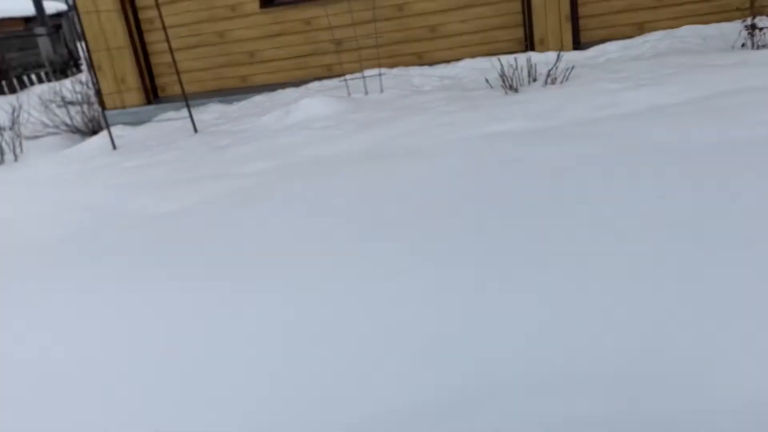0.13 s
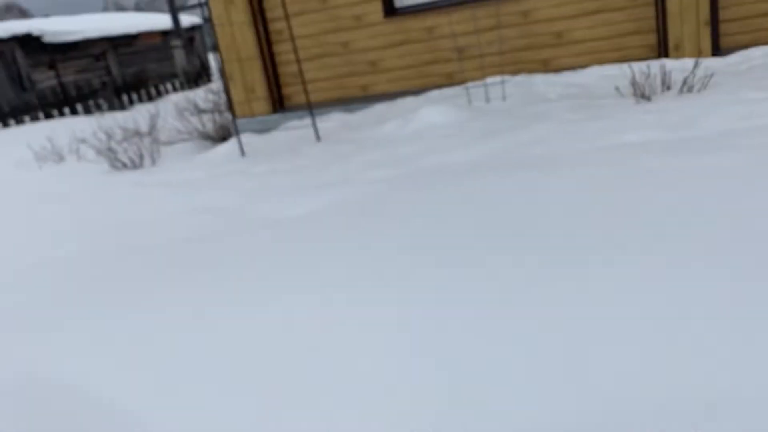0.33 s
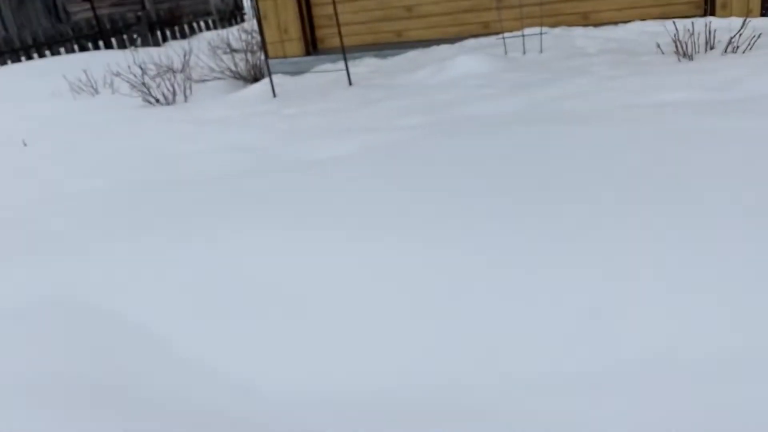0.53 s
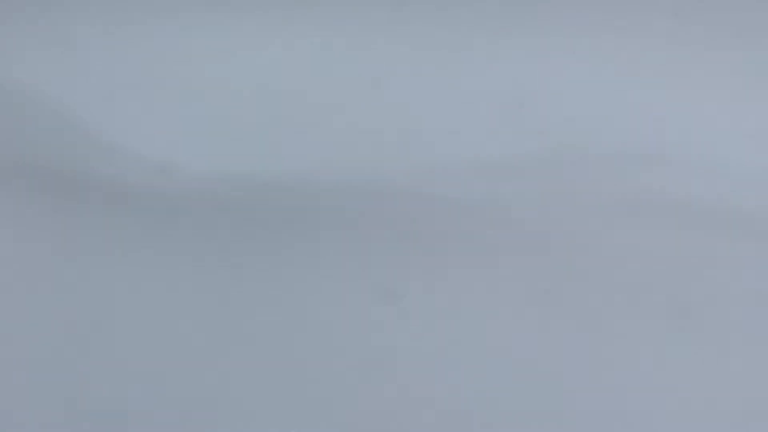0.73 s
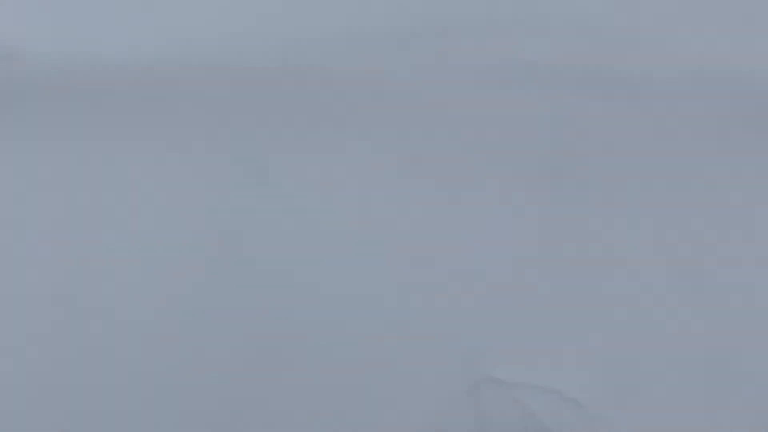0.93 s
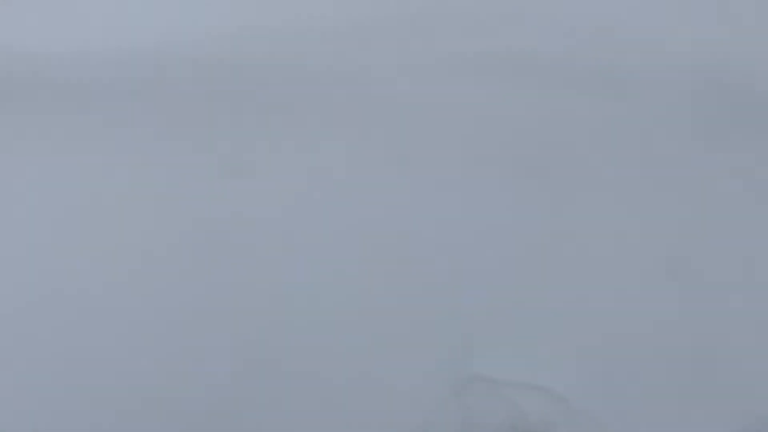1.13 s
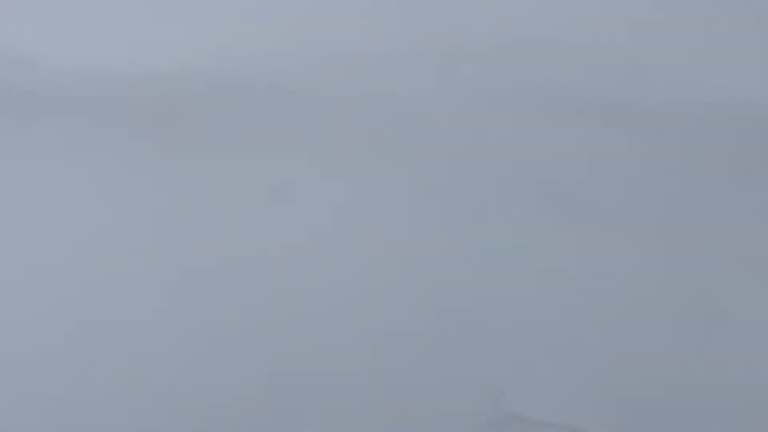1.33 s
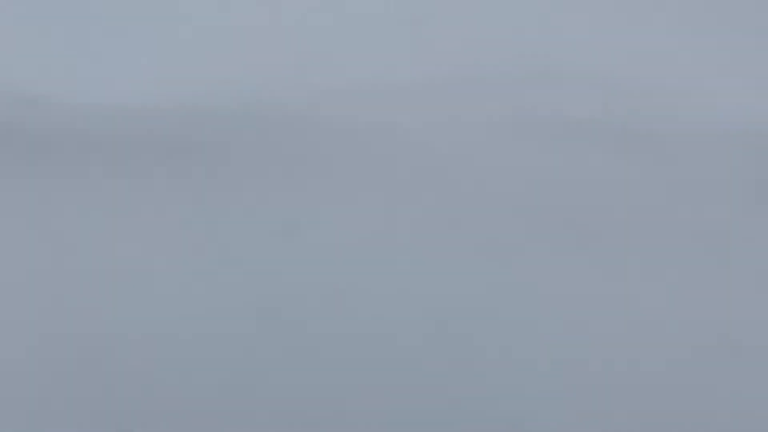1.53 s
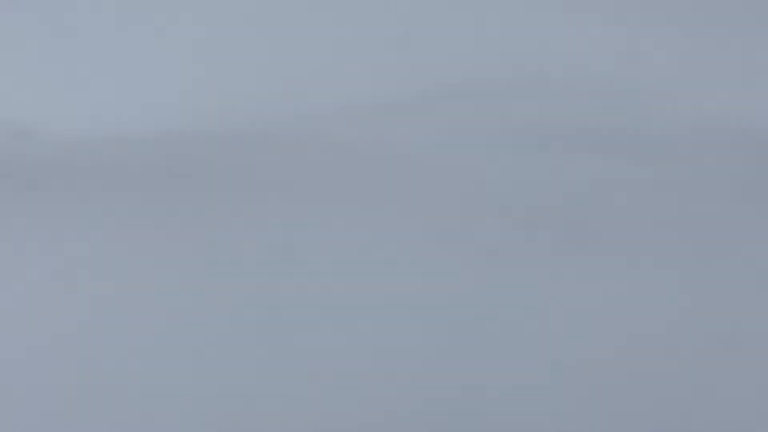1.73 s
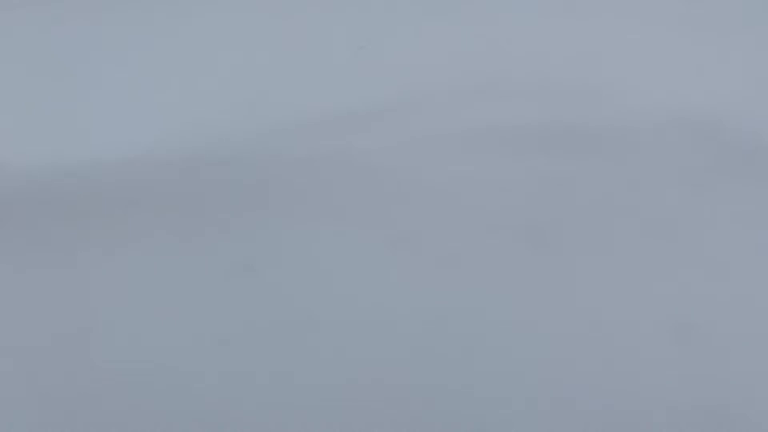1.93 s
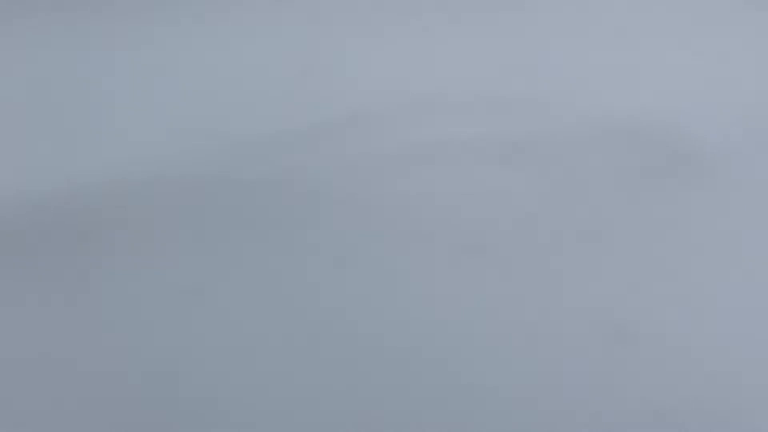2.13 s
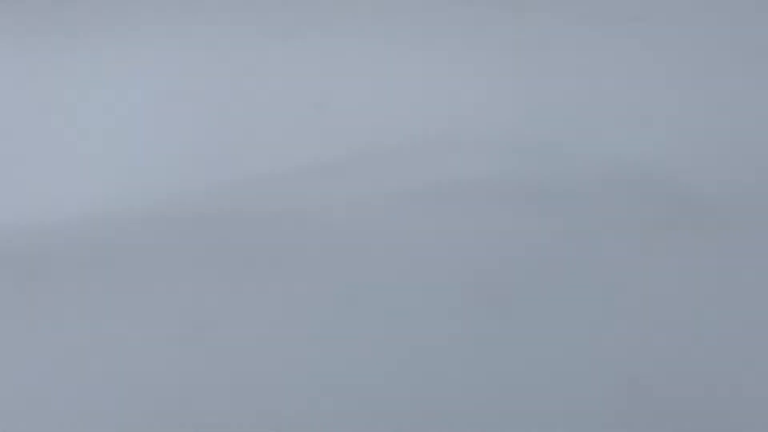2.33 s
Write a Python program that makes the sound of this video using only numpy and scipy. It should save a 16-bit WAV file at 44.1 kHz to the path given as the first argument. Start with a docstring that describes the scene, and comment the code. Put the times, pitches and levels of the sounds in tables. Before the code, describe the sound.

Heavy, uneven footsteps wade through deep snow: powder swishes along the legs, snow crunches underfoot and collapses in dull low thuds, heard close and dry from a hand-held microphone in a quiet garden.

```python
"""Swishes, crunches and dull thuds: boots wade through deep snow, heard from a hand-held camera just above.
Powder hisses along the legs and snow crunches under the soles: both are many tiny random breaks, coloured.
Collapses are one or two short pushes, mostly low, of sagging pitch. Packing snow adds low slips, a sinking
leg a soft rumble, and one boot a hollow rub; these and the faint air of the quiet garden are shaped noise."""
import sys
import numpy as np
from scipy import signal
from scipy.fft import rfft, irfft, next_fast_len
from scipy.io import wavfile
from scipy.ndimage import uniform_filter1d, map_coordinates

SR = 44100
rng = np.random.default_rng(int(sys.argv[2]) if len(sys.argv) > 2 else 0)


def generate_wav(sig):
    """Save sig (samples, or channels by samples) to the path in sys.argv[1] as 16-bit PCM at SR."""
    pcm = np.round(np.clip(np.atleast_2d(sig).T, -1, 1) * 32767).astype(np.int16)
    wavfile.write(sys.argv[1], SR, pcm)


N = 110250  # length [samples]

# how alike left and right are in the low sounds: (frequency [Hz], likeness [0 to 1])
BASS_ALIKE = [(60, 1), (400, 0.42)]


def amp(db):
    """Turn decibels into a gain."""
    return 10 ** (np.asarray(db) / 20)


def unit(x):
    """Scale to an rms (average strength) of 1."""
    return x / np.sqrt(np.mean(x ** 2) + 1e-20)


def along(points, hz):
    """Read (frequency [Hz], value) points at hz, on a logarithmic frequency axis."""
    f, v = np.transpose(points)
    return np.interp(np.log(hz + 1), np.log(f + 1), v)


def curve(rows):
    """Join (time [s], value) points by straight lines, one value per sample."""
    s, v = np.transpose(rows)
    return np.interp(np.arange(N) / SR, s, v)


def wobble(rate):
    """Draw a smooth random curve through `rate` random points a second."""
    knots = rng.standard_normal(int(N * rate / SR) + 4)
    return map_coordinates(knots, [np.arange(N) * rate / SR])


def bursts():
    """Small collapses: random jumps that die away, limited in size, with mean 0 and rms 1."""
    bursts_per_s, decay_s = 110, 0.015
    kicks = (rng.random(N) < bursts_per_s / SR).astype(float)
    decaying = signal.lfilter([1], [1, -np.exp(-1 / (decay_s * SR))], kicks)
    load = np.tanh(decaying)
    return unit(load - load.mean())


def clumped(x):
    """Each clump of snow breaks at pitches of its own for a few milliseconds."""
    clump_db = 2.1  # how unevenly the breaks spread over pitch and time
    z = signal.stft(x, nperseg=256)[2]
    field = rng.standard_normal(z.shape[1:])
    field = uniform_filter1d(field, size=2, axis=0)  # over pitch
    field = uniform_filter1d(field, size=4, axis=1)  # over time
    return signal.istft(z * amp(clump_db * unit(field)), nperseg=256)[1][:, :N]


def grains(rate, spread_db, bed_db):
    """Two streams of tiny breaks of uneven size, `rate` a second, on a bed of finer ones."""
    breaks = rng.random((2, N)) < rate / SR
    size = amp(spread_db * np.minimum(rng.exponential(size=(2, N)), 3))
    sign = np.sign(rng.standard_normal((2, N)))
    bed = amp(bed_db) * rng.standard_normal((2, N))
    return clumped(unit(breaks * size * sign) + bed)


def placed(pair, colour, alike, pan_db, lead_ms=0):
    """Colour two streams and mix them to left and right at rms 1; the left is ahead by lead_ms."""
    m = next_fast_len(N + 8192)
    hz = np.fft.rfftfreq(m, 1 / SR)
    # the more alike the sides, the less of the second stream
    turn = np.arccos(np.clip(along(alike, hz), -1, 1)) / 2
    mid, side = rfft(pair, m) * colour(hz) * [np.cos(turn), np.sin(turn)]
    # each side takes half of the level difference and half of the lead
    lean = amp(pan_db(hz) / 2) * np.exp(1j * np.pi * hz * lead_ms / 10 ** 3)
    return unit(irfft([(mid + side) * lean, (mid - side) / lean], m)[:, :N])


def filtered(x, response):
    """Multiply the spectrum of x by a response that depends on frequency."""
    m = next_fast_len(N + 8192)
    return irfft(rfft(x, m) * response(np.fft.rfftfreq(m, 1 / SR)), m)[..., :N]


def swish():
    """Powder slides along boots and trouser legs: many tiny breaks blur into a fine, fluttering hiss."""
    # swish of the legs, one list per leg stroke, before the lift: (time [s], level [dB])
    strokes = [
        [(0.0, -51.5), (0.06, -51), (0.196, -54), (0.222, -56), (0.398, -55.5), (0.45, -71)],
        [(0.472, -61), (0.492, -55), (0.66, -55.5), (.73, -51), (0.752, -43.5), (0.772, -52), (0.874, -44),
         (0.92, -51.5), (1.0, -62.5)],
        [(1.034, -52), (1.09, -47.5), (1.228, -49), (1.266, -54), (1.35, -62.5)],
        [(1.386, -57), (1.396, -51), (1.412, -52.5), (1.48, -46.5), (1.584, -54), (1.62, -64)],
        [(1.688, -52.5), (1.78, -49), (1.93, -50.5), (2.042, -48.5), (2.078, -58.5), (2.11, -67)],
        [(2.135, -63), (2.148, -57.5), (2.218, -50.5), (2.392, -52.5), (2.422, -61.5), (2.434, -56), (2.5, -55)],
    ]
    # colour of sliding powder: (frequency [Hz], relative level [dB per Hz])
    powder = [(300, -5.5), (1200, -4), (2200, 0), (3000, -1), (4200, -1.5), (5500, 0), (7000, 0.5),
              (9000, -0.5), (12000, -2.5), (15500, -4.5)]
    # how alike left and right are: (frequency [Hz], likeness [values above 1 act as 1])
    powder_alike = [(1500, 0.2), (2800, 0), (3900, 1.04), (5300, 0.03), (6800, 0.8), (8000, 0.4), (9000, 2),
                    (15000, 4.3)]
    # balance of the powder: (frequency [Hz], left against right [dB])
    powder_pan = [(1000, -7), (2300, -0.5), (3500, 4.5), (5300, 5), (7000, -1), (15000, 1)]
    lift_db, flutter_db, wobble_db = 4.5, 1.1, 0.37

    powder_grains = grains(rate=2800, spread_db=1.0, bed_db=5.5)
    hiss = placed(powder_grains, lambda hz: amp(along(powder, hz)),
                  powder_alike, lambda hz: along(powder_pan, hz))
    level_db = lift_db + curve(np.vstack(strokes))
    return hiss * amp(level_db + flutter_db * bursts() + wobble_db * wobble(400))


def crunch():
    """Snow grains break in bursts under the sole; the hole around the boot rings; load swells and settles."""
    # crunches before the lift: (leg, start [s], peak [s], end [s], peak level [dB], rise to the peak [dB],
    # fall after it [dB], brightness [dB per octave], resonance of the hole [Hz])
    crunches = [ ("right", -.02, 0.04, 0.1266, -45, 0.75, 2.1, 3.3, 2350),
                ("right", .16, .19, .425, -49.5, 2, 8, 0.66, 1400),
                ("right", .468, 0.483, 0.528, -44.5, 12, 6, -1.3, 1220),
                ("right", .53, 0.59, .66, -53.5, 1, 3.2, 0, 1750),
                ("left", .675, 0.657, .79, -50.5, 3.3, 4.8, 0, 420),
                ("left", .792, 0.8, .862, -40, 0, 2.5, -1.6, 1050),
                ("left", .80, 0.814, .98, -45, 2, 11.5, 3.7, 4200),
                ("left", 1.007, 0.982, 1.045, -45.5, 1, 6, -1.7, 450),
                ("left", 1.06, 1.117, 1.375, -48, 2.7, 8.6, 2.9, 4100),
                ("right", 1.378, 1.49, 1.523, -37.3, 12, 0, 0, 1800),
                ("right", 1.523, 1.55, 1.6, -41.5, 2, 3.4, 0.16, 2250),
                ("right", 1.645, 1.68, 1.915, -44, 11, 0, 0, 1030),
                ("right", 1.915, 1.96, 1.99, -47, 1, 1, 2, 1900),
                ("left", 1.96, 2.06, 2.077, -40.3, 11, 0, -1.1, 1450),
                ("left", 2.13, 2.15, 2.16, -49, 4, 3, -1.3, 420),
                ("left", 2.16, 2.205, 2.295, -39.7, 13, 4.5, 1.6, 1050),
                ("right", 2.29, 2.335, 2.41, -44.5, 1, 6, 1.6, 1250),
                ("right", 2.415, 2.44, 2.468, -46.3, 4.3, 8, 5.5, 2000),
                ("right", 2.47, 2.53, 2.53, -44.5, 5.2, 0, 1.5, 990)]
    # colour in which each leg reaches the camera: leg -> (frequency [Hz], relative level [dB per Hz])
    crust = {"left": [(60, -40), (180, -9), (350, -1), (580, -5), (900, 0.5), (1250, -2), (1800, -9),
             (2500, -10.5), (4000, -20), (9000, -45)], "right": [(60, -23), (190, 0), (330, 1.5), (700, -6),
             (950, -2.5), (1250, -0.5), (2100, -1), (2900, -7.5), (4000, -14.5), (9000, -35)]}
    # how alike left and right are: (frequency [Hz], likeness [0 to 1])
    crust_alike = [(400, 0.81), (1200, 0.76), (3000, 0.25)]
    # balance of each leg: leg -> (frequency [Hz], left against right [dB])
    crust_pan = {"left": [(400, 2.5), (900, 2), (1800, -6.5), (3000, 7.5)], "right": [(400, -10),
                 (1050, -11), (2000, -1.5), (3500, 6)]}
    # how far the left channel is ahead: leg -> lead [ms]
    crust_lead_ms = {"left": 0.19, "right": -.18}
    lift_db, burst_db = -0.5, 0.8
    ring_db, ring_octaves = 3, 0.38  # height and width of the resonance
    edge_s = 0.005  # length of the ramp at either end

    t, out = np.arange(N) / SR, np.zeros((2, N))
    for leg, start, peak, end, db, rise_db, fall_db, bright_db, ring_hz in crunches:
        def colour(hz):
            """Leg colour, brightness tilt and resonance of the hole."""
            ring = ring_db * np.exp(-(np.log2((hz + 1) / ring_hz) / ring_octaves) ** 2)
            return amp(along(crust[leg], hz) + bright_db * np.log2(hz + 1) + ring)

        gate = np.clip(np.minimum(t - start, end - t) / edge_s + 0.5, 0, 1)
        peak_inside = np.clip(peak, start, end)
        swell_db = np.interp(t, [start, peak_inside, end], [-rise_db, 0, -fall_db])
        load = gate * amp(db + swell_db)
        snow = grains(rate=1800, spread_db=0.64, bed_db=-5.5)
        out += load * placed(snow, colour, crust_alike, lambda hz: along(crust_pan[leg], hz),
                             crust_lead_ms[leg])
    return out * amp(lift_db + burst_db * bursts())


def thuds():
    """Snow gives way: each collapse is one or two short pushes, mostly low, whose pitch sags as they die."""
    # pushes of the giving snow: (time of the peak [s], peak level [dB], pitch at the peak [Hz])
    pushes = [(.484, -40, 303), (0.684, -26, 64.3), (.684, -35.5, 393), (0.744, -30.5, 69.6),
              (.771, -24, 153), (.871, -20.5, 90.5), (.916, -26.5, 101), (0.969, -31, 89),
              (1.025, -26, 100), (1.112, -29, 167), (1.118, -21.5, 75.4), (1.204, -31.5, 69),
              (1.288, -38.5, 65), (1.548, -35, 292), (1.552, -34.5, 101), (1.89, -37.5, 205),
              (2.118, -41.5, 96), (2.15, -33, 320), (2.316, -41, 160)]
    rise_cycles, fall_cycles = 0.72, 1.3
    sag = 0.21  # how fast the pitch falls, as a fraction per cycle

    t, out = np.arange(N) / SR, np.zeros(N)
    for s, db, hz in pushes:
        cycles = np.clip((t - s) * hz, -10, 10)
        width = np.where(cycles < 0, rise_cycles, fall_cycles)
        envelope = np.exp(-np.abs(cycles / width) ** 1.94)
        turns = (1 - np.exp(-sag * cycles)) / sag
        out += amp(db) * envelope * np.cos(2 * np.pi * turns)
    return out


def packing():
    """Deeper snow compacts under the weight in small, low-pitched slips."""
    # snow packing under the weight, before the lift: (time [s], level [dB])
    pack_levels = [(0, -57), (.38, -55), (.44, -57), (.49, -46.5), (.55, -52.5), (.65, -56.5), (.75, -45),
                   (.80, -35), (.86, -42.5), (.97, -54.5), (1.02, -44.5), (1.06, -64), (1.2, -49.5),
                   (1.36, -68.5), (1.46, -59), (1.55, -48.5), (1.62, -59), (1.72, -42), (1.88, -46),
                   (1.97, -57), (2.06, -46.5), (2.09, -52.5), (2.2, -56), (2.32, -51), (2.5, -58)]
    # colour of packed snow: (frequency [Hz], relative level [dB per Hz])
    packed = [(50, -28), (110, -2), (160, 3), (230, -3.5), (330, -5.5), (500, -14), (900, -41), (3000, -68)]
    lift_db, pan_db = -0.5, -4.0  # the right is the louder side

    slips = placed(grains(rate=320, spread_db=1.2, bed_db=-5.0), lambda hz: amp(along(packed, hz)),
                   BASS_ALIKE, lambda hz: pan_db)
    return slips * amp(lift_db + curve(pack_levels))


def sinking():
    """Deep, soft noise rumbles while the leg goes down."""
    # rumble of a leg sinking in, before the lift: (time [s], level [dB])
    sink_levels = [(0, -48.5), (.2, -60), (.32, -57.5), (.43, -61), (.56, -57), (.61, -48), (.68, -43.5),
                   (1.2, -43), (1.3, -46.5), (1.36, -63), (1.8, -62), (1.95, -49.5), (2.2, -61.5),
                   (2.5, -60)]
    # colour of the rumble: (frequency [Hz], relative level [dB per Hz])
    deep = [(15, -16), (35, -23), (62, -3.5), (90, -6), (130, -15), (250, -43), (800, -64)]
    lift_db, likeness = 2, 0.3  # likeness of left and right at every pitch

    rumble = placed(rng.standard_normal((2, N)), lambda hz: amp(along(deep, hz)),
                    [(60, likeness)], lambda hz: 0)
    return rumble * amp(lift_db + curve(sink_levels))


def rub():
    """A boot rubs during the first stroke: noise through one resonance gives a narrow, hollow note."""
    # strength of the rub: (time [s], level [dB])
    rub_levels = [(0, -51), (.2, -58), (.47, -78)]
    rub_hz, width_hz = 604, 230

    def ring(hz):
        """Gain of the resonance."""
        return 1 / (1 + (2 * (hz - rub_hz) / width_hz) ** 2)

    note = placed(rng.standard_normal((2, N)), ring, BASS_ALIKE, lambda hz: 5)  # 5 dB to the left
    return amp(curve(rub_levels)) * note


def air():
    """Coloured noise of steady level makes the faint background of the garden."""
    # colour of the background: (frequency [Hz], relative level [dB per Hz])
    air_colour = [(25, -30), (80, 6.5), (300, -9), (1000, -7), (4000, -21), (15000, -36.5)]
    level_db = -60
    noise = placed(rng.standard_normal((2, N)), lambda hz: amp(along(air_colour, hz)),
                   [(100, 0.24), (2000, 0.41)], lambda hz: 0)
    return amp(level_db) * noise


def scene():
    """Add up all the sounds, close and dry: the snow returns no echo."""
    return swish() + crunch() + thuds() + packing() + sinking() + rub() + air()


def record(dry):
    """Bands of the treble cancel when left and right are summed; nothing is kept above the band limit."""
    # offset between the sides, opposite at odd values: (frequency [Hz], offset [half turns])
    side_offset = [(7200, 0), (8500, 1), (9500, 1), (10500, 2), (11600, 2), (12750, 3), (13650, 3),
                   (14750, 4)]
    top_hz = 15800

    def half_offset(hz):
        """Each side takes half of the offset, in opposite directions."""
        return np.exp(0.5j * np.pi * np.interp(hz, *np.transpose(side_offset)))

    offset = filtered(dry, lambda hz: np.array([1 / half_offset(hz), half_offset(hz)]))
    return filtered(offset, lambda hz: hz < top_hz)


dry = scene()
out = record(dry)
generate_wav(out)
```